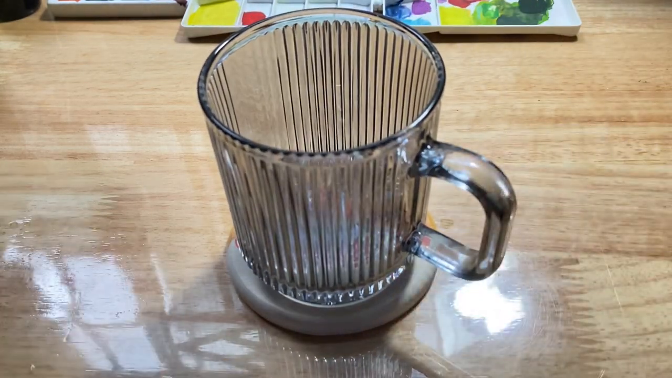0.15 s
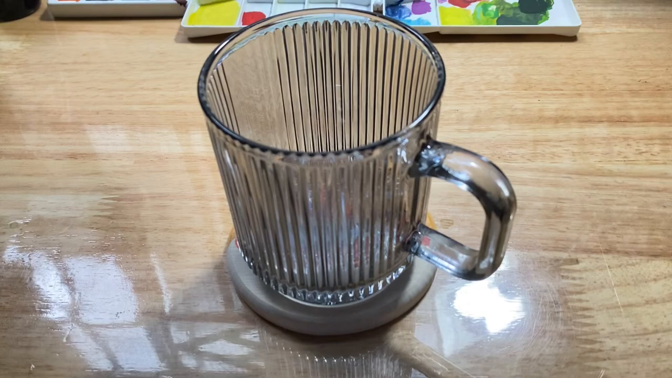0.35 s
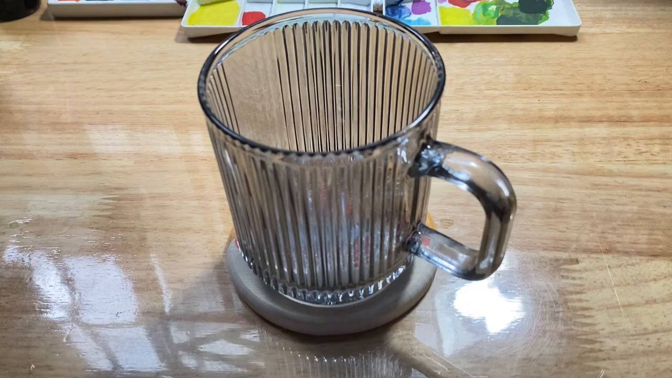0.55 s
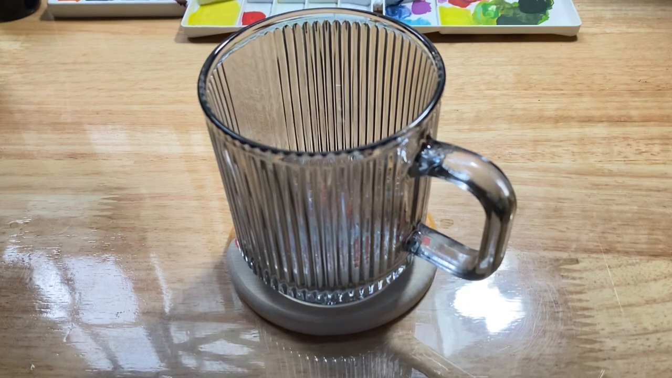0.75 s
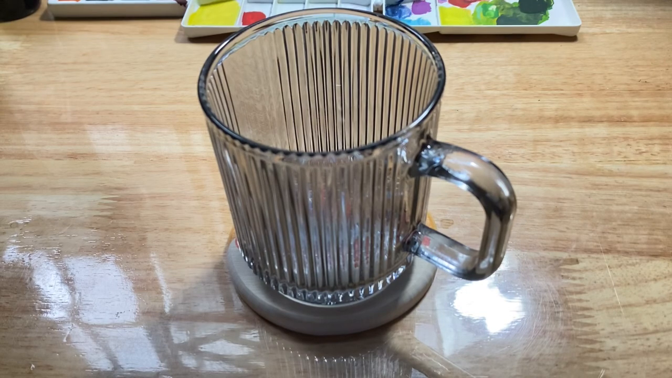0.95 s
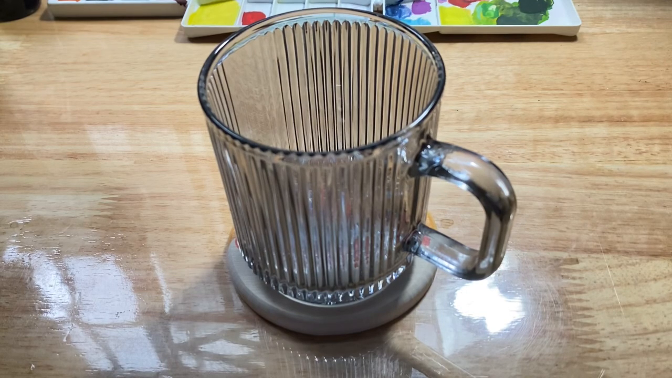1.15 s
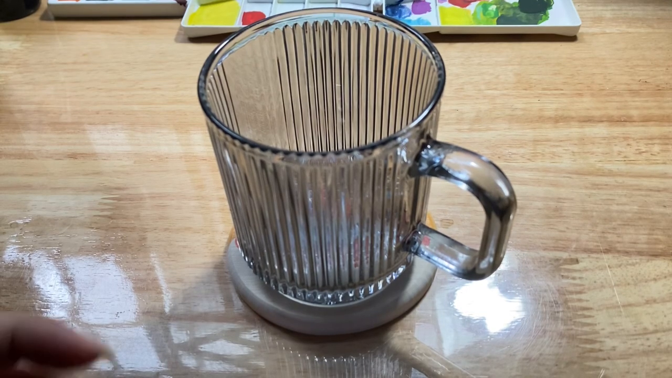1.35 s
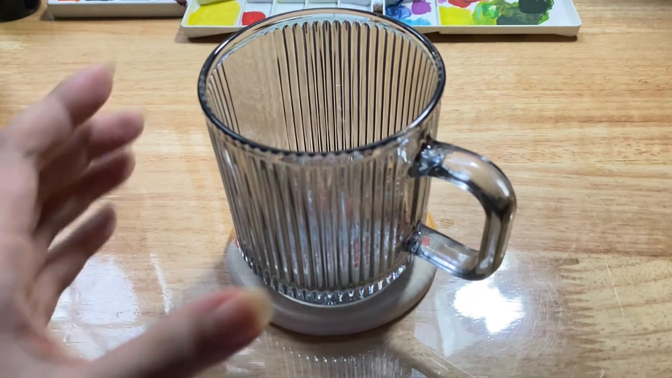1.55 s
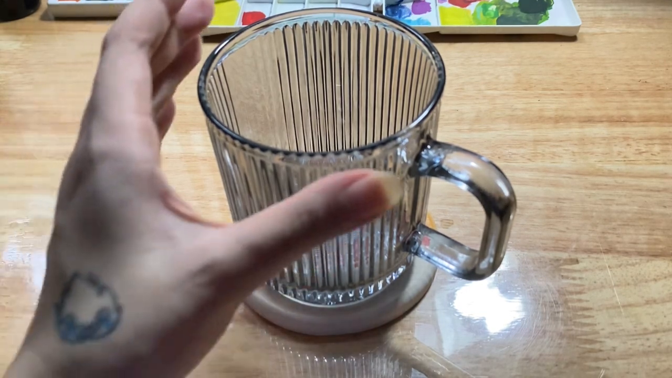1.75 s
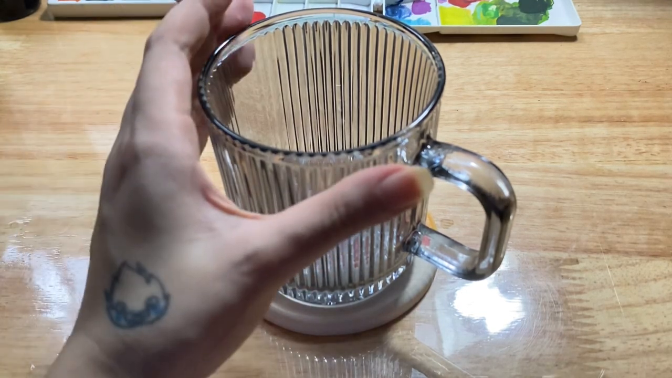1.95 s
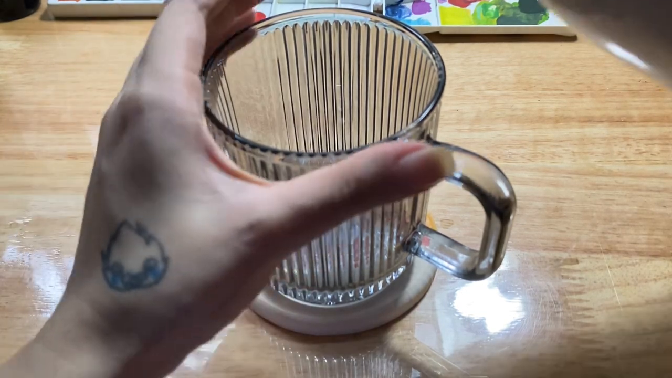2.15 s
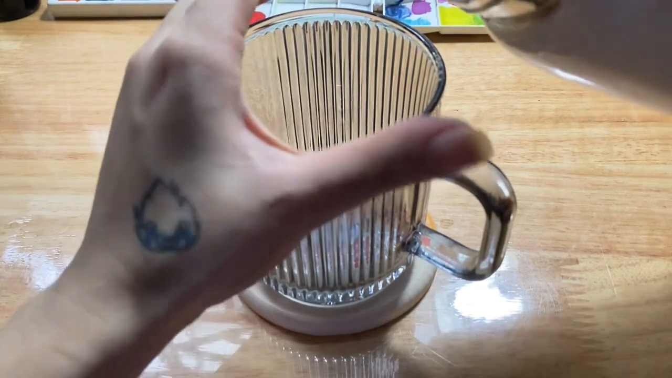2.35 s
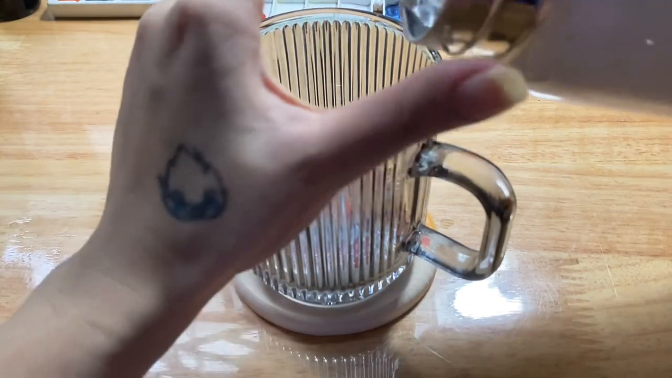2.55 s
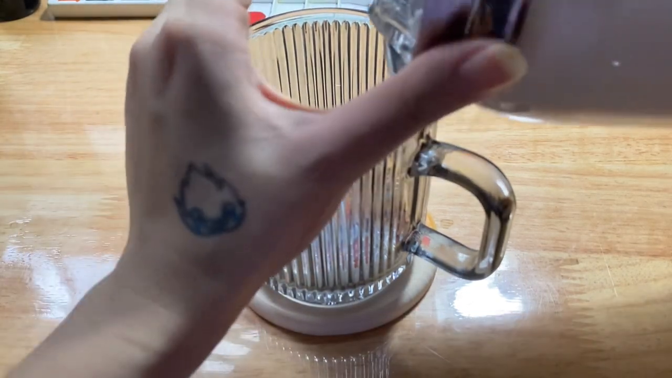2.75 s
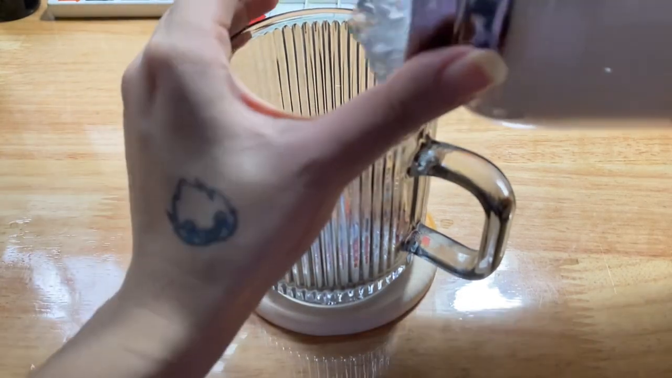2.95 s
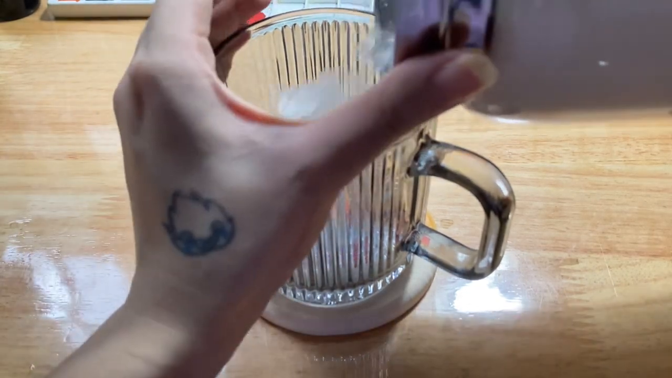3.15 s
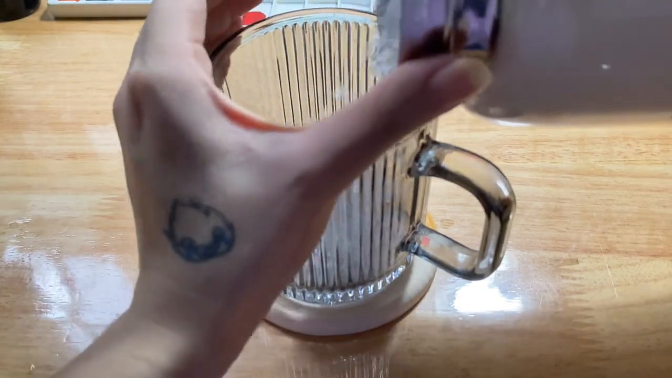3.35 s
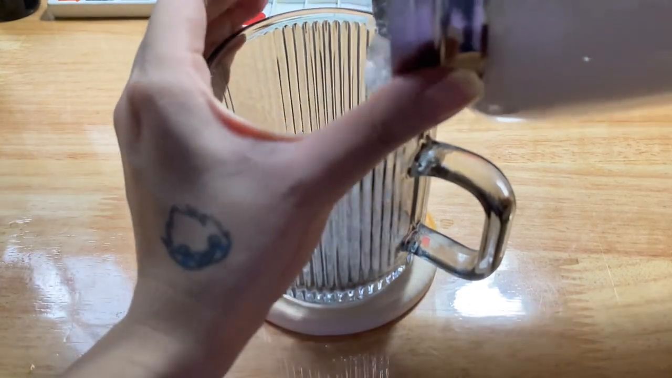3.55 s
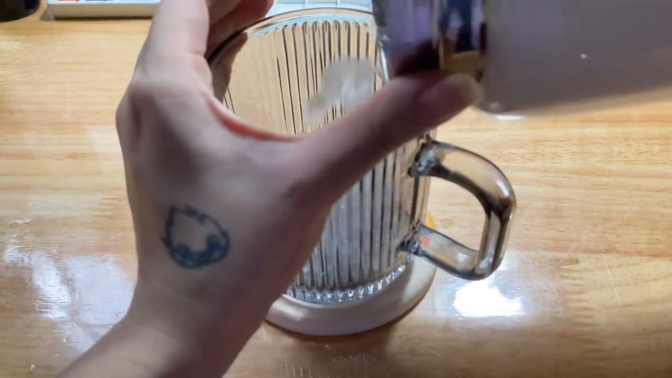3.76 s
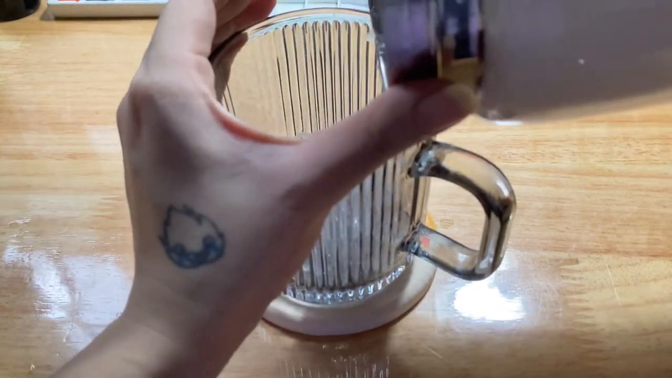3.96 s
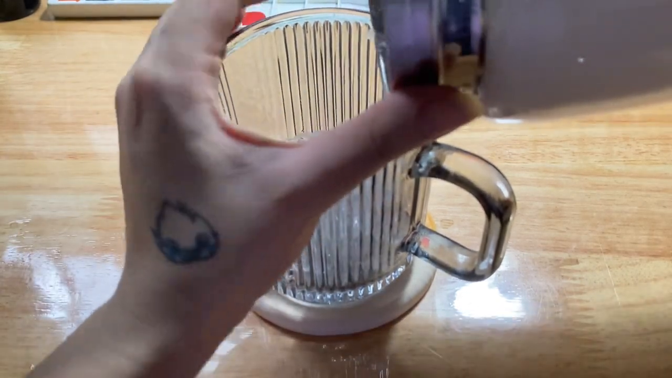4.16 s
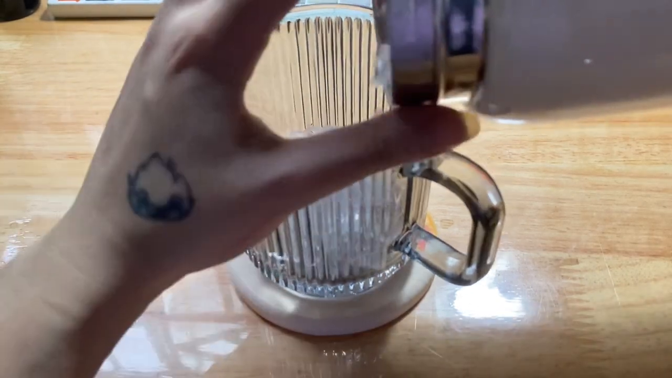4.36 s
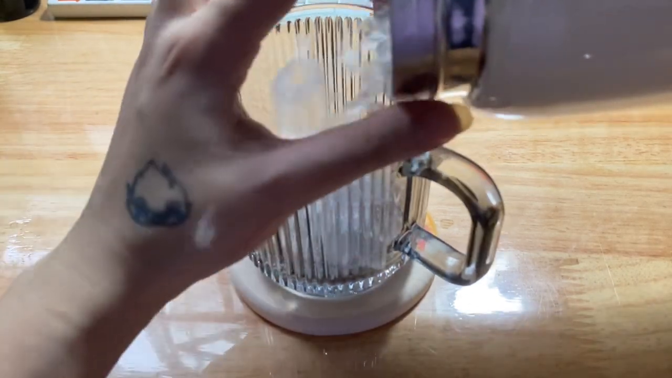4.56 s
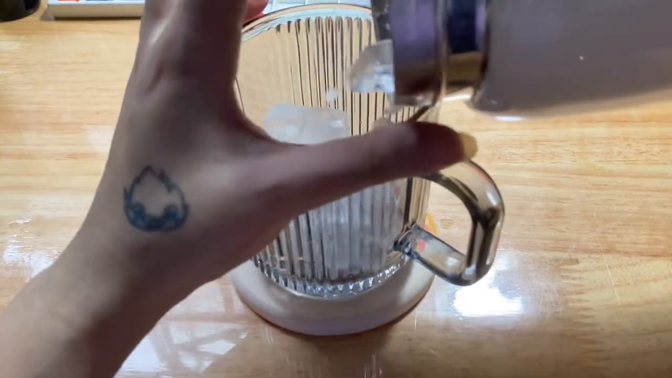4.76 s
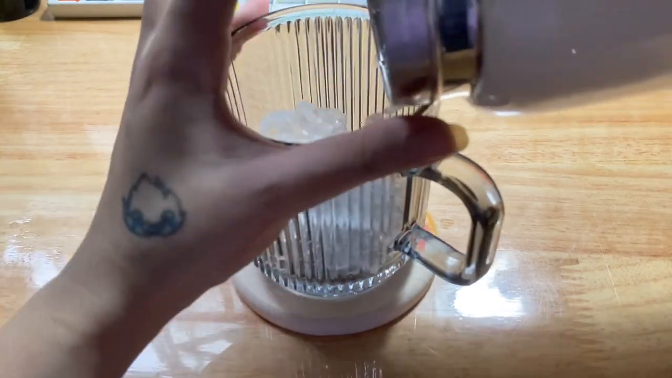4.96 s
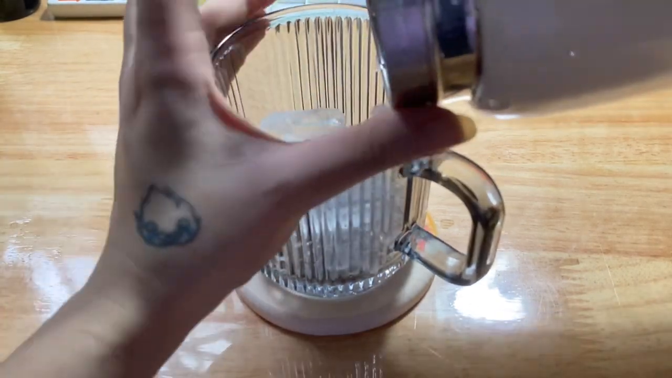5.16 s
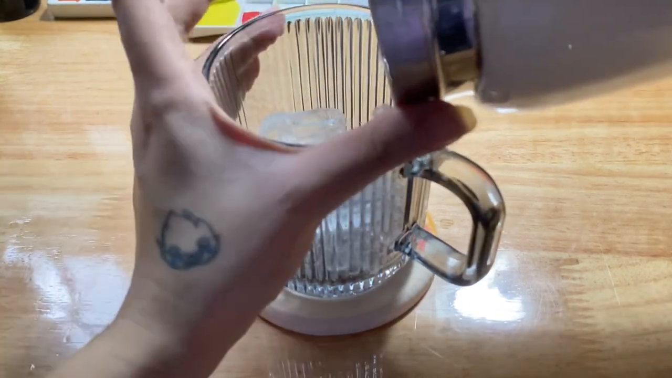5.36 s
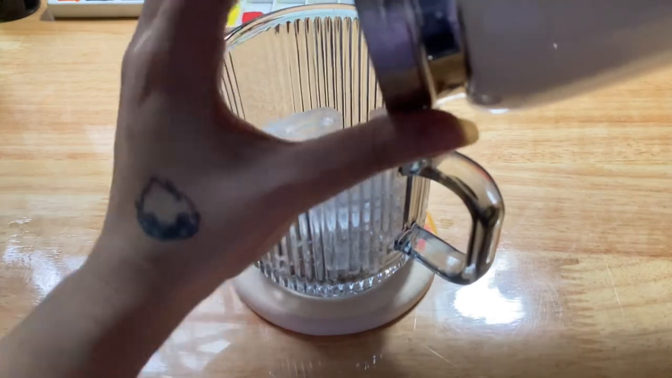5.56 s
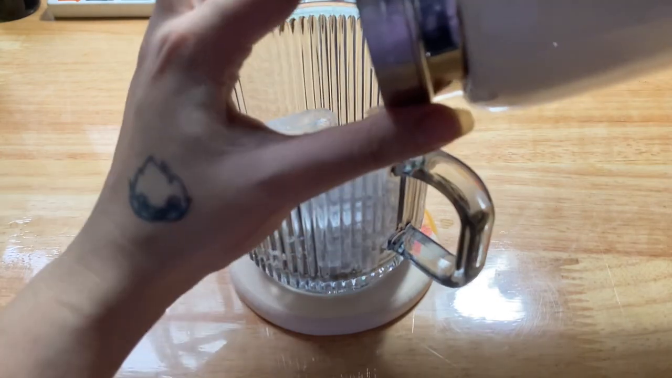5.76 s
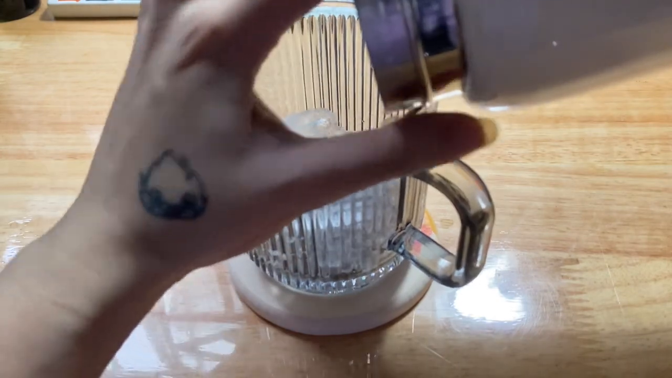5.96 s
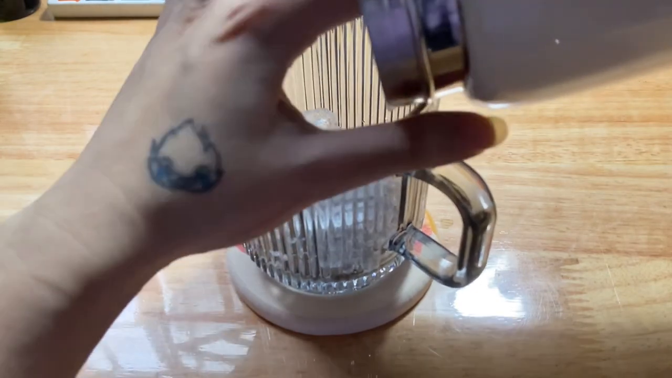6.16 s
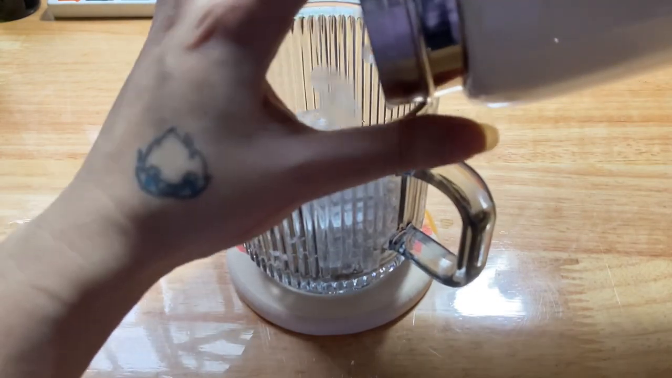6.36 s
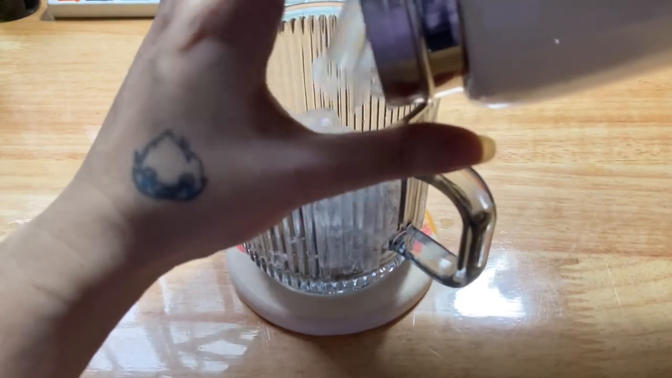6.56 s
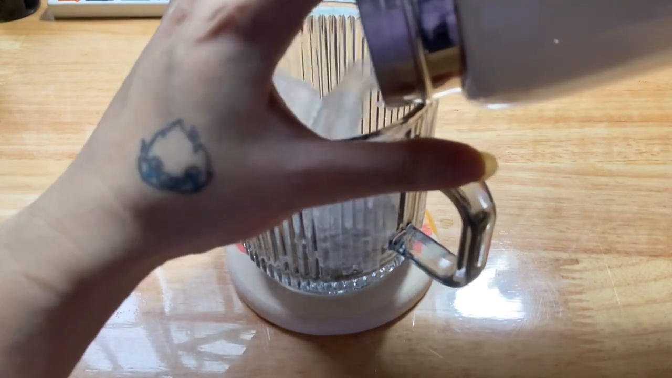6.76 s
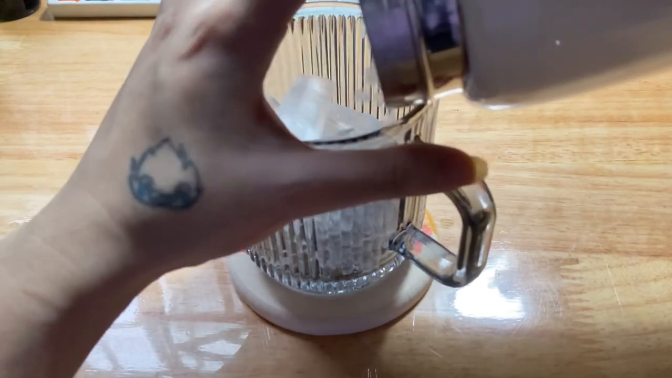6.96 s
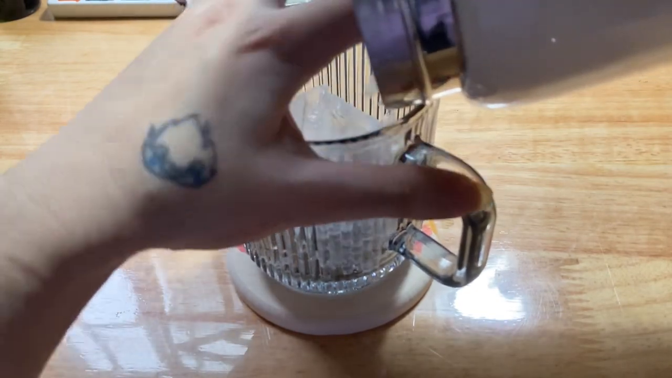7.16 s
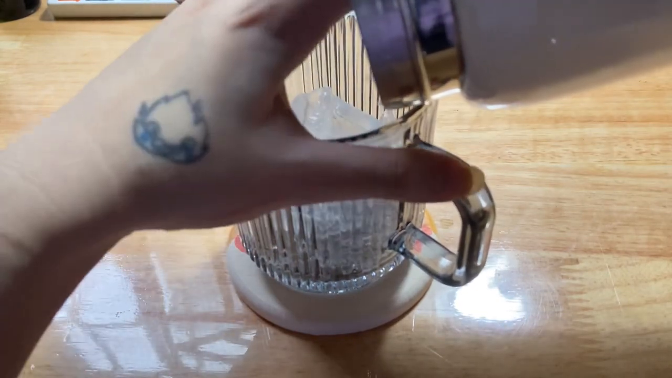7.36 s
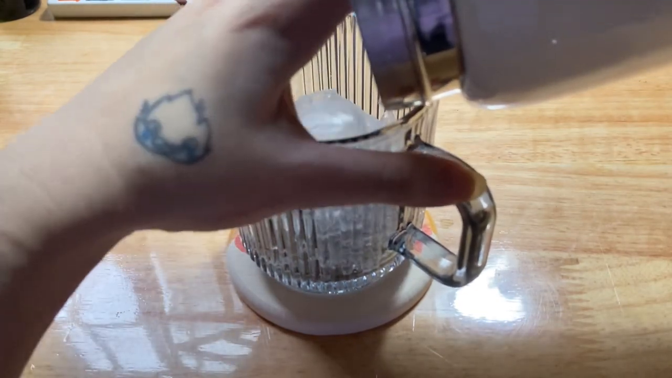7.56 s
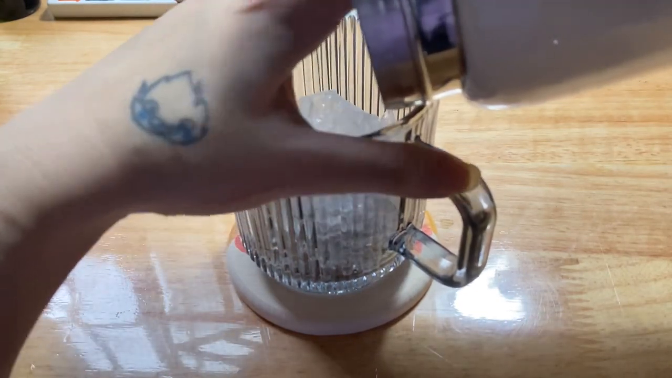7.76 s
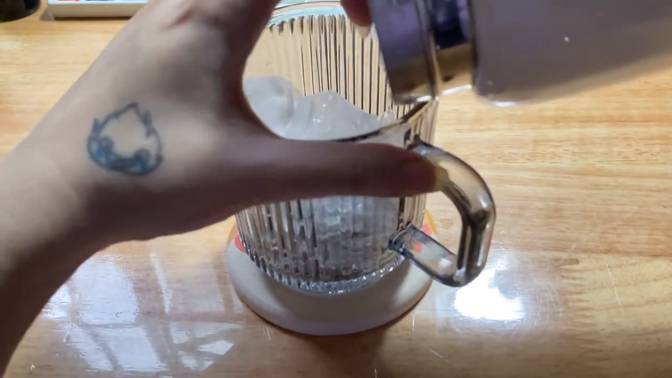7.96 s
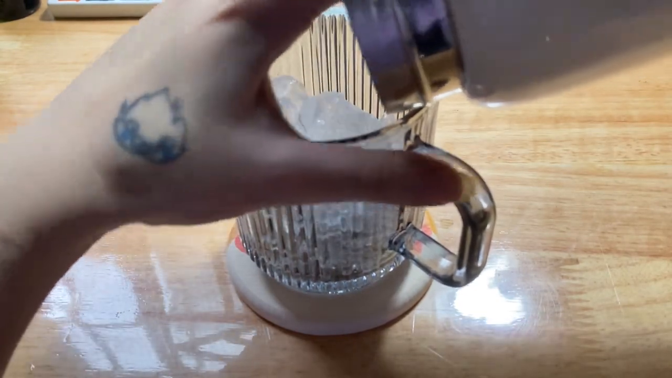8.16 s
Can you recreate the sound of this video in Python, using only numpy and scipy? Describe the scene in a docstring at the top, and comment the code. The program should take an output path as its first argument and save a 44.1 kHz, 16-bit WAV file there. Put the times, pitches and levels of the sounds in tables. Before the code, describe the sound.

After a quiet, humming start, wet ice rattles out of a metal flask, knocking and pinging brightly in a glass mug.

```python
"""Ice shaken into a glass mug

Ice chips are shaken out of a steel flask into a glass mug that a hand holds, on a wooden table.
Blows and pings are sums of decaying modes; cracks, sliding ice and fan are shaped noise; tiny chips tick by chance.
A motor adds wavering sine lines, and a short diffuse reverberation follows the blows."""
import sys
import numpy as np
from scipy import signal
from scipy.fft import rfft, irfft, next_fast_len
from scipy.io import wavfile
from scipy.ndimage import uniform_filter1d, map_coordinates

SR = 44100
rng = np.random.default_rng(int(sys.argv[2]) if len(sys.argv) > 2 else 0)


def int16_out(signal):
    """Quantize to a 16-bit WAV file."""
    q = np.round(np.clip(np.atleast_2d(signal).T, -1, 1) * 32767)
    wavfile.write(sys.argv[1], SR, q.astype(np.int16))


N = 362061
TOP_HZ = 16100  # upper band limit
TAIL_DB, TAIL_T60_S = -12, 0.35  # what rings on in the glass once the loose ice has damped it

# loose chips on the move: [t/s, rattle reference level/dB]
RATTLE_LEVEL = [(2.87, -63), (2.92, -40.5), (3.03, -40.5), (3.14, -31.5), (3.36, -35.5), (3.47, -40),
                (3.69, -46.5), (3.8, -59.5), (3.91, -45.5), (4.02, -62.5), (4.13, -59), (4.24, -44),
                (4.4, -40), (4.57, -35), (4.79, -39), (4.95, -49), (5.2, -50), (5.3, -54.5), (5.44, -57.5),
                (5.65, -55.5), (5.78, -67), (6.03, -59), (6.05, -51.5), (6.11, -44.5), (6.3, -43),
                (6.44, -38), (6.77, -34.5), (6.9, -41.5), (7.2, -49.5), (7.33, -41.5), (7.45, -36),
                (7.62, -48), (7.76, -41), (7.98, -48.5), (8.09, -61)]
# modes of the steel flask: [f/Hz, relative level/dB, nominal t60/s]
FLASK_MODES = [(2770, -8.5, 0.038), (3866, 1.5, 0.033), (4096, 0, 0.027)]
# modes of the mug's rim: [f/Hz, relative level/dB, nominal t60/s]
RIM_MODES = [(2000, -1.5, 0.099), (1838, -5, 0.1), (2240, -4.5, 0.11)]
# high mode of the mug's wall: [f/Hz, relative level/dB, nominal t60/s]
GLASS_MODES = [(5100, 0.7, 0.1)]
# modes of the ice chips: [f/Hz, relative level/dB, nominal t60/s]
ICE_MODES = [(6040, 7.5, 0.026), (6340, 9.5, 0.014), (6770, -2.5, 0.072), (7730, -4.5, 0.065)]


def amp(db):
    """Decibel law: amplitude gain of a level in dB."""
    return 10 ** (np.asarray(db) / 20)


def unit(x):
    """Normalisation: x at rms 1."""
    return x / np.sqrt(np.mean(x ** 2) + 1e-20)


def along(points, hz):
    """Interpolation of (f/Hz, value) points on a logarithmic frequency axis."""
    f, v = np.transpose(points)
    return np.interp(np.log(hz + 1), np.log(f + 1), v)


def curves(rows):
    """Linear interpolation in time: one value per sample for each column after t/s."""
    s, *cols = np.transpose(rows)
    return [np.interp(np.arange(N) / SR, s, c) for c in cols]


def wobble(rate):
    """Slow random modulation: a smooth curve through `rate` random knots a second."""
    knots = rng.standard_normal(int(N * rate / SR) + 4)
    return map_coordinates(knots, [np.arange(N) * rate / SR])


def filtered(x, response):
    """Linear filtering: the spectrum of x times a complex response of frequency."""
    m = next_fast_len(N + SR // 8)
    return irfft(rfft(x, m) * response(np.fft.rfftfreq(m, 1 / SR)), m)[..., :N]


def coloured(x, spectrum):
    """Spectral shaping: x filtered by (f/Hz, level/dB) points, at rms 1."""
    return unit(filtered(x, lambda hz: amp(along(spectrum, hz))))


def ring(modes, t, spread_db, life=1, scatter=0.034, rise=0.23):
    """Modal superposition: one blow excites decaying sines at random strength, pitch and phase, twice over."""
    hz, db, t60 = np.transpose(modes)[:, :, None]
    draw = rng.random((4, len(modes), 1))
    level_db = db + spread_db * (draw[0] - .5) * 2
    size = amp(level_db - 60 * t / (life * t60)) * (1 - np.exp(-t * hz / rise))  # rise in cycles
    pitch = hz * (1 + scatter * (draw[1] - .5))
    return np.array([np.sum(size * np.sin(2 * np.pi * (pitch * t + start)), axis=0) for start in draw[2:]])


def room(x):
    """Diffuse reverberation: convolution with noise whose every frequency decays at its own rate."""
    # decay of the room: [f/Hz, t60/s]
    room_t60 = [(150, 0.42), (2000, 0.22), (12000, 0.0092)]
    hz, t, z = signal.stft(rng.standard_normal((2, SR // 4)), SR, nperseg=256)
    decay = amp(-60 * t / along(room_t60, hz)[:, None])
    tail = signal.istft(z * decay, SR, nperseg=256)[1]
    return signal.oaconvolve(x, tail / np.linalg.norm(tail[0]), axes=1)[:, :N]


def ports(pair):
    """Interchannel coherence: two unrelated versions are mixed to a set likeness, balance and treble lag."""
    # coherence of the channels: [f/Hz, left-right likeness]
    likeness = [(40, 1), (130, 0.93), (290, 0.82), (640, 0.32), (1400, 0.016), (3200, 0.15), (5000, 0.46),
                (6400, 0.15), (8400, 1), (16000, 0.96)]
    # balance of the channels: [f/Hz, left minus right/dB]
    balance = [(30, -16.5), (60, 2.5), (300, -3.5), (900, -2.5), (3000, -3), (5500, -2.5), (7400, 3.5),
               (8500, -0.5)]
    lag_from_hz = 6150

    def turn(hz):
        return np.arccos(np.clip(along(likeness, hz), 0, 1)) / 2

    def tilt(hz):
        lead = 1j * np.pi * np.maximum(hz / lag_from_hz - 1, 0)  # the right treble comes a little late
        return amp(along(balance, hz) / 2) * np.exp(lead)

    mid, side = filtered(pair, lambda hz: np.array([np.cos(turn(hz)), np.sin(turn(hz))]))
    return filtered(np.array([mid + side, mid - side]), lambda hz: np.array([tilt(hz), 1 / tilt(hz)]))


def hum():
    """Broadband and tonal noise: a fan as five bands of noise, a motor as lines wavering in phase and strength."""
    # levels of the low fan noise: [t/s, deep band level/dB, drone level before its wobble/dB]
    low_levels = [(0, -37.5, -45), (1.25, -44, -42), (2.2, -44, -44.5), (3.3, -43.5, -48.5),
                  (4.0, -39.5, -39), (5.6, -49.5, -41.5), (6.6, -40.5, -36.5), (7.1, -42.5, -47),
                  (8.21, -48, -40.5)]
    # level of the narrow moan: [t/s, level/dB]
    moan_level = [(0, -46), (.8, -40.5), (1.25, -44.5), (1.7, -37.5), (2.2, -48), (8.21, -57.5)]
    # level of the faint high hiss: [t/s, level/dB]
    treble_level = [(0, -60), (1.0, -63.5), (2.3, -68.5), (2.85, -74), (5.8, -65.5), (8.21, -72)]
    # spectra of the five bands: [f/Hz, relative level/dB]
    deep_band = [(15, -48), (33, -28), (46, 9), (54, 6), (64, 5.5), (85, -35.5), (120, -51.5), (300, -120)]
    drone_band = [(50, -48), (80, -1), (108, 8), (145, 4.5), (200, -20.5), (260, -20), (400, -84)]
    moan_band = [(110, -54), (150, -14), (178, 6), (195, 10.5), (210, -1), (250, -40.5), (400, -120)]
    hiss_band = [(150, -26), (260, -4.5), (380, -1), (470, -9.5), (750, -18), (980, -8), (1200, -15),
                 (2300, -29), (4500, -48), (7500, -38.5), (8600, -99), (13000, -101), (16000, -67)]
    treble_band = [(1500, 3), (3500, 3), (7500, -6), (13500, -7), (14600, -46)]
    # motor lines: [f/Hz, relative level/dB]
    motor_lines = [(54, -49), (323, -48), (969, -58.5)]
    t = np.arange(N) / SR
    deep_db, drone_db = curves(low_levels)
    moan_db, = curves(moan_level)
    treble_db, = curves(treble_level)
    white = rng.standard_normal((2, N))
    air = amp(deep_db) * coloured(white, deep_band)
    air += amp(drone_db + 0.55 * wobble(3.9)) * coloured(white, drone_band)
    air += amp(moan_db) * coloured(white, moan_band)
    air += amp(-47 + 1.3 * wobble(7.8)) * coloured(white, hiss_band)
    air += amp(treble_db) * coloured(white, treble_band)
    lines = np.zeros(N)
    for hz, db in motor_lines:
        lines += amp(db + 2.0 + 1.54 * wobble(7.4)) * np.sin(2 * np.pi * hz * t + 0.5 * wobble(9))
    return air + lines * np.array([[1], [.4]])


def touches():
    """Impulsive contact: a hand touches something, heard as faint decaying bursts of band-limited noise."""
    # touches: [t/s, relative level/dB, f/Hz]
    hand_touches = [(.587, -53, 11200), (1.683, -43, 3280), (1.697, -42, 3500)]
    out, t = np.zeros((2, N)), np.arange(SR // 30) / SR
    for s, db, hz in hand_touches:
        band = signal.butter(2, [hz / 1.5, min(hz * 1.14, TOP_HZ)], "bandpass", fs=SR)
        noise = rng.standard_normal((2, len(t))) * rng.standard_normal(len(t))
        burst = amp(db + 6.5 - 60 * t / 0.053) * signal.lfilter(*band, noise)
        out[:, round(s * SR):][:, :len(t)] += burst
    return out


def grains(rate, spread_db, bed):
    """Shot noise: short soft bursts of noise at random moments, `rate` a second, over an even bed."""
    sizes = amp(spread_db * np.clip(rng.standard_normal(N), -2, 1.5))
    sparks = (rng.random(N) < rate / SR) * sizes
    t = np.arange(SR // 30) / SR
    burst = (1 - np.exp(-t / 0.00027)) * amp(-60 * t / 0.015)
    envelope = unit(bed + unit(signal.oaconvolve(sparks, burst)[:N]))
    return envelope * rng.standard_normal((2, N))


def sing(x):
    """Resonance: sliding ice keeps the modes of rim, flask and glass sounding; wet contact widens them."""
    widening = 1.7

    def peak(f, hz, width):
        return 1j * f * width / (hz * hz - f * f + 1j * f * width)

    def response(f):
        total = 0
        for hz, db, t60 in RIM_MODES + FLASK_MODES + GLASS_MODES:
            width_hz = widening * np.log(1000) / (np.pi * t60)
            total = total + amp(db) * peak(f, hz, width_hz)
        return total

    return unit(filtered(x, response))


def ticks(count):
    """Random impacts: tiny chips tick by chance, each near one mode of flask, rim or ice, with its own size and life."""
    hz, db, t60 = np.transpose(2 * FLASK_MODES + RIM_MODES + ICE_MODES)  # the flask is struck twice as often
    draw, t = rng.random((count, 7)), np.arange(SR // 120) / SR
    start = round(RATTLE_LEVEL[0][0] * SR)
    pick = (draw[:, 0] * len(hz)).astype(int)
    at = start + (draw[:, 1] * (N - start)).astype(int)
    pitch = hz[pick] * (1 + 0.11 * (draw[:, 2] - .5))
    size_db = db[pick] - 2.2 * np.log(draw[:, 3]) + 3.5 * wobble(25)[at]  # loud ticks come in clumps
    life = t60[pick] * (.2 + .3 * draw[:, 4])
    size = amp(size_db[:, None] - 60 * t / life[:, None]) * (1 - np.exp(-t / 0.00066))
    where = (at[:, None] + np.arange(len(t))).ravel()
    sides = []
    for k in (5, 6):  # a random phase for each side
        wave = size * np.sin(2 * np.pi * (pitch[:, None] * t + draw[:, [k]]))
        sides.append(np.bincount(where, wave.ravel(), N + len(t))[:N])
    return unit(np.array(sides))


def rattle():
    """Granular friction: chance ticks over the grainy hiss, fizz and rumble of wet ice that slides."""
    # spectrum of sliding ice: [f/Hz, relative level/dB]
    slide_band = [(1000, -34), (1600, -38), (2100, 2.5), (3100, 1), (3900, -11.5), (4700, -4.5), (6300, 0),
                  (8000, 0.5), (10500, -77)]
    fizz_band = [(7000, -86), (8800, 2.0), (13000, 1.5), (14500, 0.0), (15500, -32.5)]
    rumble_band = [(200, -13), (400, 5.5), (900, -10.5), (1500, -14), (2200, -69)]
    level_db, = curves(RATTLE_LEVEL)
    livelier_db = level_db + 40  # above a lively rattle at -40 dB
    fizz_db, rumble_db = -43.5 + 1.13 * livelier_db, -49.5 + 0.96 * livelier_db
    moving = np.arange(N) > RATTLE_LEVEL[0][0] * SR
    grain = grains(350, spread_db=6.5, bed=0.6)
    fizz_grain = grain + 0.52 * grains(150, spread_db=4.0, bed=0.12)
    mix = amp(-7.5) * ticks(count=2500) + amp(-4.5) * coloured(grain, slide_band)
    mix += amp(-5) * sing(grains(240, spread_db=6.5, bed=0.28))
    out = amp(level_db) * mix
    out += amp(fizz_db) * coloured(fizz_grain, fizz_band)
    out += amp(rumble_db) * coloured(grain, rumble_band)
    return moving * out


def pings():
    """Single-mode resonance: a chip catches a wall and one high mode sings until loose ice damps it."""
    # pings: [t/s, relative level/dB, nominal f/Hz]
    ping_events = [(3.39, -29.5, 3950), (3.55, -32, 3930), (3.635, -29, 3870), (4.27, -32.5, 3870),
                   (4.5344, -24, 3230), (4.558, -17.5, 5210), (4.577, -25, 5200), (4.5925, -22, 6160),
                   (4.696, -18, 3760), (6.316, -30, 3900), (6.3553, -32, 3880), (6.3802, -32, 3900),
                   (6.546, -24, 5380), (6.549, -31, 4110), (6.665, -29, 3750), (6.707, -21.5, 5140),
                   (6.7287, -25, 3870), (6.7425, -16, 5190), (7.468, -34, 5200), (6.756, -28, 3820),
                   (6.76, -33, 5700), (6.814, -25.5, 3780), (6.83, -29, 6020), (6.836, -22, 5210),
                   (6.8658, -29, 4100), (6.925, -26, 4050), (6.9629, -25, 5200), (6.965, -31, 4060),
                   (6.995, -33.5, 5200), (7.0987, -35, 5200), (7.37, -23, 3750), (7.505, -22, 5200),
                   (7.9093, -24.5, 5180)]
    rise_s, lasts_s = 0.0013, 0.0098
    out, t = np.zeros((2, N)), np.arange(SR // 14) / SR
    damped = np.exp(-(t / lasts_s) ** 2) + amp(TAIL_DB - 60 * t / TAIL_T60_S)
    swell = (1 - np.exp(-t / rise_s)) * damped
    for s, db, hz in ping_events:
        roughness = 1 + 2.2 * uniform_filter1d(rng.standard_normal(len(t)), size=40)
        note = ring([(hz, 0, GLASS_MODES[0][2])], t, spread_db=2.0, scatter=0.012)
        out[:, round(s * SR):][:, :len(t)] += amp(db) * swell * roughness * note
    return out


def knocks():
    """Impact excitation: each blow cracks, rings flask, glass and ice, and pushes the table; the room answers."""
    # blows: [t/s, table thump/dB, mug ring/dB, mug ring f/Hz, flask/dB, ice/dB, nominal contact/ms]
    # (levels are relative)
    blows = [(2.8898, -17.5, -28, 2046, -14, -12, 2.16), (2.933, -38, -30, 2310, -25.5, -44, 1.2),
             (2.9655, -63, -49.5, 2120, -21, -34, 1.5), (2.9876, -35, -40, 2040, -23.5, -39, 0.99),
             (3.0277, -59, -51.5, 2180, -24.5, -50, 2.1), (3.0791, -38, -51, 2100, -15, -20.5, 0.74),
             (3.1212, -26.5, -25, 2006, -12.5, -11, 3.8), (3.1325, -60, -42, 2050, -29, -22, 1.7),
             (3.164, -22, -21, 785, -57, -11, 2.8), (3.2103, -60, -31, 2070, -19.5, -23.5, 3.9),
             (3.2306, -60, -50, 2120, -35, -15, 1.4), (3.243, -62, -32, 2150, -16, -11, 1),
             (3.3427, -33, -55, 2280, -48, -17.5, 0.64), (3.366, -57, -43, 1880, -40, -26.5, 6.9),
             (3.6066, -60, -50, 2150, -27.5, -40, 1.2), (3.6196, -60, -40, 2190, -24.5, -23, 2.7),
             (3.6823, -30, -37, 2220, -60, -45, 0.59), (3.842, -37, -34, 2200, -22.5, -6.5, 0.9),
             (4.0465, -28.5, -39.5, 2080, -29, -24.5, 0.84), (4.1468, -15.5, -22, 2060, -11, -11, 2.05),
             (4.287, -34, -41, 2240, -27.5, -47, 2.7), (4.346, -42, -53, 2160, -21, -56, 0.45),
             (4.383, -25.5, -33, 2100, -30.5, -19.5, 1.2), (4.4576, -60, -32.5, 1155, -34, -57, 3.5),
             (4.4627, -57.5, -31, 2590, -27.5, -60, 3), (4.484, -60, -33.5, 2720, -31, -54, 1.5),
             (4.5248, -62, -40, 2130, -18, -30, 3.4), (4.533, -47, -15, 2650, -14, -10.5, 0.47),
             (4.557, -55, -18.5, 1890, -16.5, -17.5, 4.1), (4.577, -29, -31, 2240, -32, -18, 2.9),
             (4.5926, -24, -38, 1870, -20, -5, 0.92), (4.697, -55, -47, 1860, -16.5, -19, 1.2),
             (4.703, -60, -23.5, 1860, -25, -19.5, 1.4), (4.7903, -35, -24.5, 2013, -38, -18, 4.3),
             (5.0092, -17, -27.5, 2080, -17.5, -11.5, 1.1), (5.0595, -60, -52, 2100, -36, -37, 2.2),
             (5.11, -49, -56, 2240, -47, -32, 1.7), (5.125, -31, -45, 2200, -35, -18, 3.2),
             (5.1307, -16, -21, 2204, -12, -11.5, 1), (5.2356, -26, -33.5, 2070, -23.5, -22, 1.7),
             (5.46, -23, -32, 2050, -28, -25, 2.3), (5.599, -33, -44, 2070, -38, -37.5, 2.1),
             (5.6286, -60, -41, 2000, -48, -45, 1.4), (5.6446, -31.5, -33, 2230, -29, -23, 0.94),
             (5.845, -57, -64, 1770, -38.5, -45, 4.6), (6.042, -53.5, -41, 2240, -54, -53, 6.4),
             (6.149, -29.5, -39, 2055, -43.5, -60, 26), (6.2816, -40, -55.5, 2100, -42, -40, 5.9),
             (6.316, -45, -38, 2270, -21, -52, 0.57), (6.4178, -51, -43, 2150, -29, -30.5, 8),
             (6.451, -62, -43, 2130, -25.5, -43, 2.6), (6.5459, -39, -17, 2020, -21, -16, 2.5),
             (6.567, -60, -44, 2260, -21, -29, 3.6), (6.6473, -60, -33.5, 2110, -34, -40, 1.3),
             (6.6636, -33, -35, 2070, -20.5, -46, 1.9), (6.707, -29.5, -24.5, 2060, -21.5, -23.5, 1.3),
             (6.7429, -30.5, -30.5, 1874, -33, -27.5, 5.3), (6.8055, -57, -28, 2090, -21.5, -38, 4.5),
             (6.824, -60, -32, 2040, -15, -19.5, 2.2), (6.837, -36, -29, 2060, -36, -21, 1.3),
             (6.8665, -56, -38, 2100, -25, -21.5, 3.5), (6.9142, -60, -38, 2100, -23.5, -22, 2.4),
             (6.9231, -35.5, -31, 2000, -21.5, -20, 2.7), (6.962, -48, -28, 2030, -34.5, -40, 2),
             (7.099, -37, -45, 2000, -41, -51, 1.1), (7.2537, -41, -42, 2900, -47, -29, 3.2),
             (7.2661, -38, -31, 2230, -23, -36, 2.7), (7.324, -32, -25.5, 1990, -19.5, -30, 5.3),
             (7.369, -32, -28.5, 2730, -17, -22.5, 1.1), (7.455, -42, -47, 2750, -32, -43, 1.4),
             (7.4916, -33, -30, 1990, -43, -25.5, 6.8), (7.6033, -63, -61, 2100, -38, -31.5, 1.8),
             (7.634, -57, -61, 2100, -31, -30, 2.2), (7.6744, -60, -59, 2100, -36, -43, 0.8),
             (7.742, -60, -38.5, 2060, -27, -26.5, 3.4), (7.752, -34.5, -28, 2090, -18, -28, 1.1),
             (7.8158, -47, -40, 2120, -30, -45, 5), (7.86, -58, -43, 1970, -28, -53, 0.89),
             (7.9105, -28, -21.5, 1990, -35, -20.5, 2.4), (7.952, -55, -30, 1970, -29, -44, 1.6),
             (7.985, -29, -36, 2020, -31, -53, 1.8), (7.996, -60, -36, 1990, -32, -50, 1.5),
             (8.02, -55, -32.5, 1990, -40, -28.5, 4.4), (8.201, -43, -34, 2000, -36, -43, 4.5)]
    # clicks of ice on ice alone: [t/s, relative ice level/dB, nominal contact/ms]
    ice_clicks = [(3.301, -14.5, 0.23), (3.473, -20, 0.4), (3.483, -28, 0.4), (3.491, -26, 0.6),
                  (3.5116, -9.5, 0.7), (3.69, -28, 0.6), (3.7074, -23, 1), (3.7359, -25, 1),
                  (3.749, -31, 0.5), (4.676, -29, 1.3), (4.881, -19, 1.14), (4.956, -36, 0.7),
                  (5.102, -32, 1), (5.286, -33, 0.7), (5.3108, -38, 0.67), (5.3474, -33, 1.5),
                  (6.7985, -23, 0.6), (7.047, -32, 0.7)]
    # modes of the wooden table: [f/Hz, relative level/dB, t60/s]
    table_modes = [(106.2, -3, 0.16), (145.4, 0.5, 0.13), (194.7, -1.5, 0.17), (264, -5.5, 0.052),
                   (323, -3.5, 0.062), (389.5, 2, 0.041), (458, -9.5, 0.081), (610, -7, 0.041),
                   (726, -13.5, 0.031), (885, -14.5, 0.095), (1082, -7, 0.027)]
    # spectrum of a crack: [f/Hz, relative level/dB]
    crack_band = [(300, -15), (900, 8), (1500, -1.5), (2500, 2.5), (4000, 5.5), (7500, 4), (9000, 6.5),
                  (13000, 3.5), (16000, -6.5)]
    silent_db, faintest_thump_db = -90, -52  # a part left alone; lighter blows do not move the table
    t, long = np.arange(SR // 22) / SR, np.arange(SR // 7) / SR
    lead = amp(1.5 - 60 * t[::-1] / 0.0071)  # a few milliseconds of noise swell up before each blow
    clicks = [(s, silent_db, silent_db, RIM_MODES[0][0], silent_db, db, ms) for s, db, ms in ice_clicks]
    body, clatter, cracks, thuds = np.zeros((4, 2, N + SR))
    for s, thump_db, low_db, low_hz, flask_db, ice_db, ms in blows + clicks:
        at = round(s * SR)
        here, thump_here = slice(at, at + len(t)), slice(at, at + len(long))
        crack_db = max(flask_db, ice_db) - 16 + 3 * np.log2(ms)  # 3 dB for each doubling of the contact
        onset = 1 - np.exp(-t / (0.00023 * ms))  # a long crumbling contact starts softly and lasts
        damped = np.exp(-(t / (0.0081 * ms ** 0.5)) ** 3) + amp(TAIL_DB - 60 * t / TAIL_T60_S)
        swell = (1 - np.exp(-t / (0.000052 * ms))) * damped  # the glass builds up, then loose ice damps it
        mug_modes = [(low_hz, 0, .12), (low_hz * 1.2, -14, .05)]
        glass = amp(low_db + 1.5) * ring(mug_modes, t, spread_db=3.0, scatter=0.012)
        chips = amp(flask_db - 2.0) * ring(FLASK_MODES, t, spread_db=1.7, life=0.36, scatter=0.09)
        chips += amp(ice_db - 7.5) * ring(ICE_MODES, t, spread_db=5, life=0.21, scatter=0.054)
        if thump_db > faintest_thump_db:
            thump = ring(table_modes, long, spread_db=2.0, scatter=0.12, rise=1.21)
            body[:, thump_here] += amp(thump_db + 2.0) * thump
            # the dull noise of a thump between the table's modes
            thuds[:, thump_here] += amp(thump_db - 5 - 60 * long / 0.05) * (1 - np.exp(-long / 0.0033))
        # a contact is a volley of strikes, 900 a second at random, fading over a time that grows with ms
        lasting = np.exp(-(t / (0.0023 * ms)) ** 2)
        strikes = rng.standard_normal(len(t)) * (rng.random(len(t)) < 900 / SR)
        volley = (lasting * strikes + (t == 0))[:SR // 40]
        struck = signal.fftconvolve([chips, glass], volley[None, None], axes=2)[..., :len(t)]
        # the volley spreads each ring in time but keeps its energy
        chips = struck[0] * np.linalg.norm(chips) / np.linalg.norm(struck[0])
        glass = struck[1] * np.linalg.norm(glass) / np.linalg.norm(struck[1])
        body[:, here] += swell * glass
        clatter[:, here] += onset * chips
        cracks[:, here] += onset * amp(crack_db + 2.0) * (lasting + amp(-12.0 - 60 * t / 0.14))
        cracks[:, at - len(t):at] += amp(crack_db) * lead
    cracks = cracks[:, :N] * coloured(rng.standard_normal((2, N)), crack_band)
    thud_filter = signal.butter(2, (250, 800), "bandpass", fs=SR)
    body += thuds * unit(signal.lfilter(*thud_filter, rng.standard_normal(thuds.shape)))
    body, clatter = body[:, :N], clatter[:, :N]
    return body + clatter + cracks + room(amp(-4.0) * cracks + amp(-13) * clatter + amp(-18) * body)


def scene():
    """Superposition: hum, touches, rattle, pings and knocks add before the stereo image is set."""
    return ports(hum() + touches() + rattle() + pings() + knocks())


def record(dry):
    """Band limitation: nothing passes at or above the upper limit."""
    return filtered(dry, lambda hz: hz < TOP_HZ)


dry = scene()
out = record(dry)
int16_out(out)
```